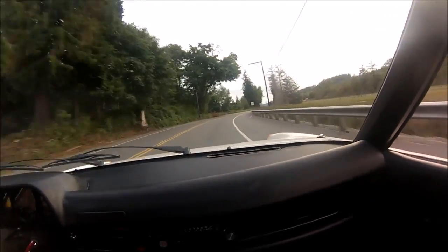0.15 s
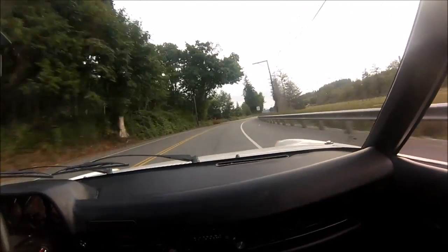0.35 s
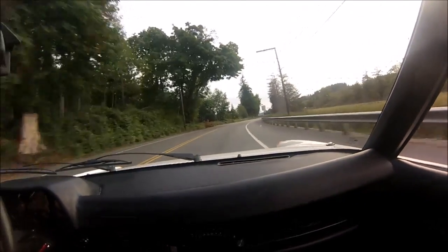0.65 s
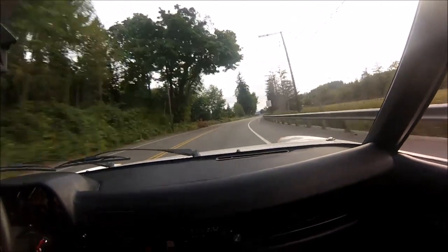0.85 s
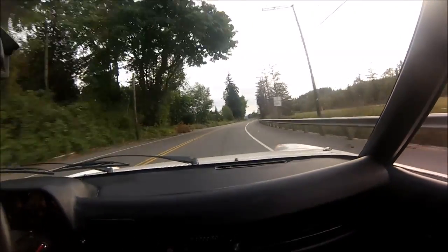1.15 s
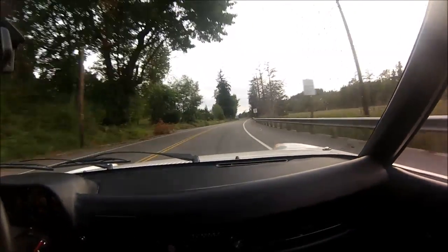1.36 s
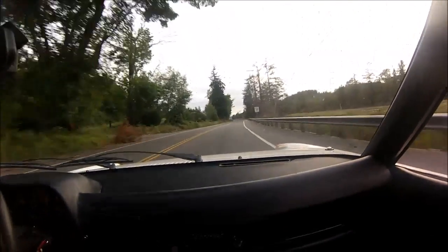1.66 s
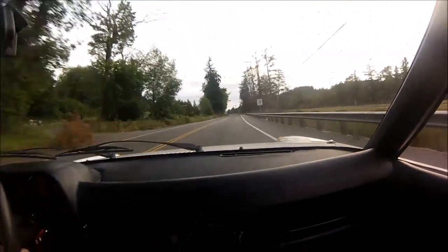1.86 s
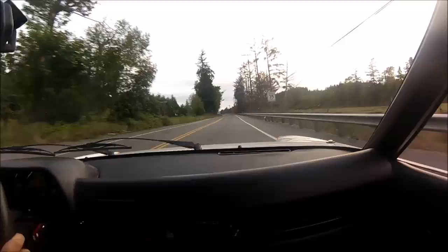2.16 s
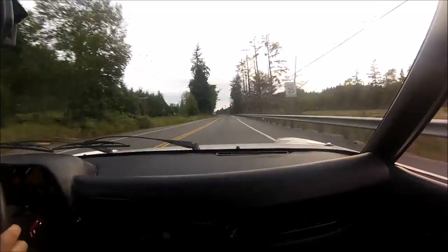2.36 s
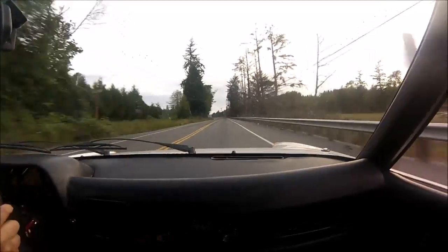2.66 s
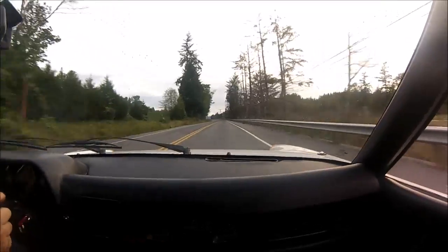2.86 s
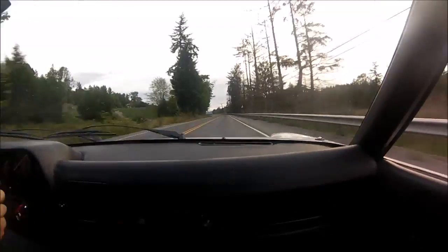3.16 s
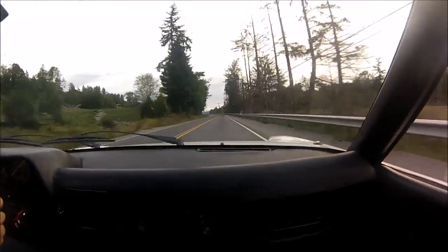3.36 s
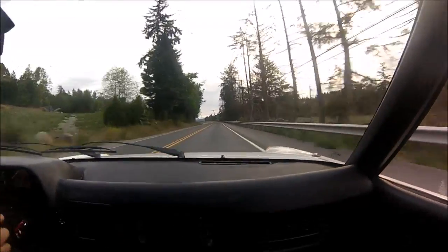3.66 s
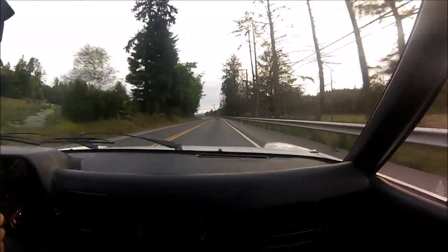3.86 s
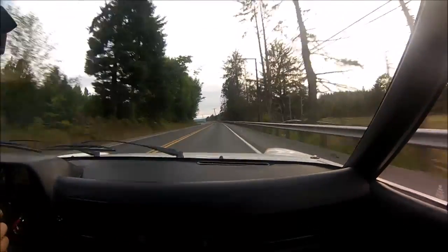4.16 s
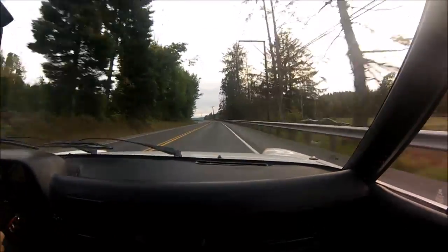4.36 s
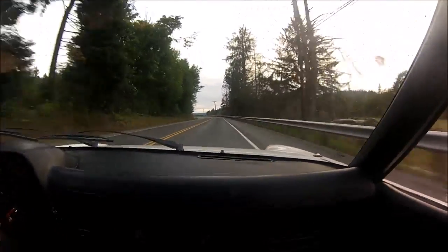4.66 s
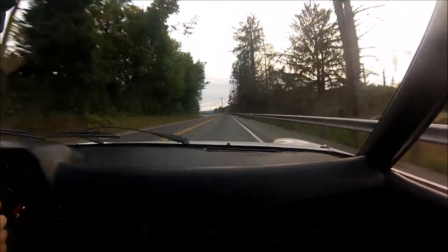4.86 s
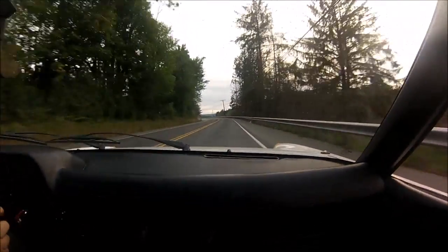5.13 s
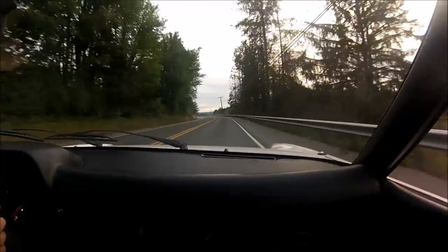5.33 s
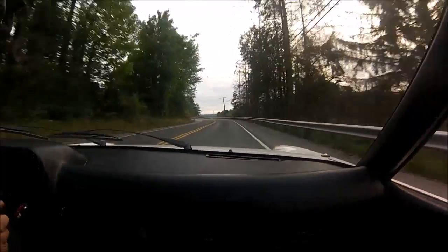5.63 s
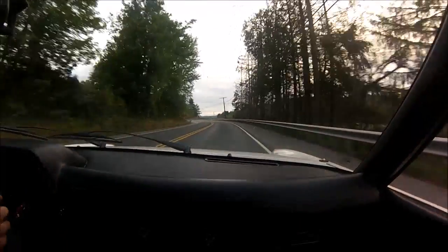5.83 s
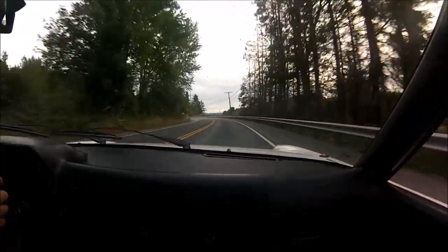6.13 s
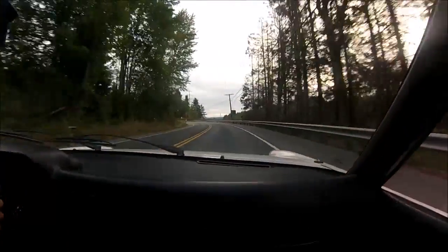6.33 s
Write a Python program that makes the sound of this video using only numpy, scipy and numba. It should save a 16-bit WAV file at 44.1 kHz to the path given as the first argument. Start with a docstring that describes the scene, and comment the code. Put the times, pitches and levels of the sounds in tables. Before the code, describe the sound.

A steady low engine drone and deep body boom fill a tight car cabin. Intake growl and fast squeaky chirping mark the throttle opening, then a hard, buzzing pull climbs gently in pitch. Around four seconds it fades to softer coasting as rushing air swells and loose tin buzzes. Soft low bumps punctuate the roar; the onboard microphone's automatic gain dips after them.

```python
"""Inside a small air-cooled sports car on a country road: the driver opens the throttle, pulls for
about three seconds and lifts off. The engine is a stack of sine tones at multiples of its cycle rate,
which swell as they slide through the cabin's resonances. A high, slightly wobbling tone, pulsed by the
cycle, is the belt's chirp, and short pressure pulses are bumps. Coloured noise makes body boom, road roar,
wind hiss and the buzz of loose tin. An automatic gain control ducks everything after each peak."""
import sys
import numpy as np
from scipy import signal
from scipy.fft import rfft, irfft, next_fast_len
from scipy.io import wavfile
from scipy.ndimage import uniform_filter1d
from numba import njit

SR = 44100
rng = np.random.default_rng(int(sys.argv[2]) if len(sys.argv) > 2 else 0)


def digitize_waveform(pressure):
    """Quantize a signal to 16-bit integers and store it at the path in sys.argv[1].

    Rows of a 2-D input are taken as channels; values are limited to [-1, 1].
    """
    field = np.atleast_2d(pressure).T
    bounded = np.clip(field, -1, 1)
    quanta = np.round(bounded * 32767).astype(np.int16)
    wavfile.write(sys.argv[1], SR, quanta)


N = 286209
T = np.arange(N) / SR  # time of each sample [s]


def engine(hz, phase, throttle):
    """Each multiple of the cycle is a nearly pure tone; fixed resonances lift the tones passing through."""
    # Strength of each tone under load: (multiple of the cycle rate [count], relative level [dB])
    pull_rows = [(2, -20), (4, 0), (5, -9), (6, -10.5), (7, -4.5), (8, -21), (9, -14.5), (10, -24),
                 (11, -26), (12, -26), (13, -29), (14, -32), (15, -20), (16, -25), (17, -28), (18, -28),
                 (19, -22), (20, -26), (21, -34), (22, -33), (23, -30), (24, -22.5), (25, -26.5), (26, -30),
                 (27, -27), (28, -33), (29, -31), (30, -34), (31, -36), (32, -36)]
    # Soft tones that sound throughout, plainest off the throttle: (multiple [count], relative level [dB])
    coast_rows = [(2, -1), (3, -6), (4, 2), (5, -11), (6, -9.5), (8, -11)]
    # Cabin resonances: (pitch [Hz], half width [Hz], boost [dB])
    cabin = [(230, 8, 3), (318, 13, 8), (355, 12, 7), (592, 10, 10), (690, 25, 5), (728, 9, 9),
             (838, 16, 12), (885, 16, 8), (938, 20, 10), (1680, 50, 8), (149, 5, -3)]
    # Intake resonances: (pitch [Hz], half width [Hz], relative level [dB])
    intake = [(590, 14, 0), (552, 12, -6), (295, 12, -5), (728, 16, -13), (860, 50, -12), (950, 20, -11)]
    # Intake howls at part throttle:
    # (full from [s], full until [s], rise [s], level [dB], starting pitch [share of the open pitch])
    howls = [(.45, 0.88, .05, -29.5, .86), (4.3, 4.46, .45, -24, 1)]
    load_open_db, load_shut_db, coast_db = -21, -36.5, -31.5
    # As the revs climb under load, the exhaust loses weight and gains edge
    sag_from_hz, sag_db_per_hz = 34.94, -1.16
    edge_db_per_hz = 1  # per octave above the fourth multiple
    upper_db, upper_slope_db = -36, -0.3336  # multiples above the table, and change per multiple
    howl_rest_db, howl_fall_s, howl_glide_s = -50, .15, .12

    climb_hz = (hz - sag_from_hz) * throttle
    load_db = load_shut_db + (load_open_db - load_shut_db) * throttle + sag_db_per_hz * climb_hz
    howl_db = howl_rest_db
    tuning = 1
    for start_s, end_s, rise_s, db, low in howls:
        howl_db = howl_db + (db - howl_rest_db) * gate(start_s, end_s, rise_s, howl_fall_s)
        # The pitch is low while the howl rises, then glides up to the open pitch
        tuning = tuning - (1 - low) * gate(start_s - rise_s, start_s, rise_s, howl_glide_s)

    pull, coast = dict(pull_rows), dict(coast_rows)
    top_multiple = pull_rows[-1][0]
    out = 0
    for k in sorted(pull.keys() | coast.keys()) + list(range(33, 57)):
        tone_hz = k * hz
        edge_db = edge_db_per_hz * climb_hz * np.log2(k / pull_rows[1][0])
        tone_db = pull.get(k, upper_db + upper_slope_db * (k - top_multiple))
        cabin_db = sum(db * hump(tone_hz, f, w) for f, w, db in cabin)
        load = undb(load_db + edge_db + tone_db + cabin_db)
        howl = undb(howl_db) * sum(undb(db) * hump(tone_hz, f * tuning, w) for f, w, db in intake)
        coasting = undb(coast_db + coast[k] + 3.8 * walk(7.)) if k in coast else 0
        size = np.sqrt(load ** 2 + howl ** 2 + coasting ** 2) * undb(1.2 * walk(9.))
        wander = 0.43 * walk(4.96)  # slow drift of the phase [rad]
        out = out + size * np.sin(k * phase + rng.uniform(0, 2 * np.pi) + wander)
    return np.sqrt(2) * out  # the levels above are rms


def belt(phase):
    """Like a slipping belt, a tone chirps once a cycle; later every second chirp is weaker."""
    pitch_hz, half_length = 5130, .2  # half length as a share of the cycle
    first_s, end_s, rise_s = .745, 1.29, 0.36  # the chirps creep in before first_s
    skip_s, skip_db = .99, -12
    start_db, fade_db_per_s = -45.5, -5
    level = undb(start_db + fade_db_per_s * (T - first_s)) * gate(first_s, end_s, rise_s, .01)
    turns = (phase - phase[int(first_s * SR)]) / (2 * np.pi)
    count = np.round(turns)
    chirp_shape = np.exp(-((turns - count) / half_length) ** 2)
    wobbling_hz = pitch_hz * (1 + .012 * walk(60.))
    tone = np.sin(2 * np.pi * np.cumsum(wobbling_hz) / SR)
    weaker_db = skip_db * (T > skip_s) * (count % 2 == 0)
    return level * undb(weaker_db + 1.5 * walk(32.0)) * chirp_shape * tone


def bumps():
    """Each bump squeezes the cabin air: the pressure jumps one way, then leaks back."""
    # (time of the peak [s], level before gain control [dB], rise [s], direction of the push [sign])
    bump_rows = [(0.218, -1.5, 0.0024, -1), (0.353, -2, 0.0017, -1), (0.631, 0.5, 0.0023, 1),
                 (1.154, -4.5, 0.0042, 1), (1.351, -9, 0.0082, -1), (3.006, -7, 0.0084, 1),
                 (3.256, -1, 0.0023, 1), (4.011, -2.5, 0.0015, -1), (4.66, -3.5, 0.01, -1),
                 (5.01, -1, 0.0057, -1), (5.347, -3.5, 0.012, -1), (5.625, -4, 0.0053, 1),
                 (6.012, -1, 0.0077, 1), (6.157, 1, 0.0049, -1)]
    fall_s = 0.019
    out = np.zeros(N)
    for s, db, rise_s, way in bump_rows:
        side_s = np.where(T < s, rise_s, fall_s)
        out += np.sign(way) * undb(db) * np.exp(-((T - s) / side_s) ** 2)
    return out


def body_boom(throttle):
    """Deep noise of the body, with its peaks softly rounded so that it stays even."""
    # Colour of the boom: (pitch [Hz], relative level [dB])
    boom_colour = [(10, -29), (16, -15), (24, 5), (33, -0.5), (50, -0.5), (62, -6), (80, -15), (115, -5),
                   (150, -14), (200, -21), (270, -39.5), (400, -60)]
    level_db, loaded_db = -13, -3  # loaded_db is added at full throttle
    rounding = .6
    noise = bands(boom_colour, 0.45, 12.0, 1.0)
    return undb(level_db + loaded_db * throttle) * np.tanh(rounding * noise) / rounding


def road_roar(throttle, rush_db, chop):
    """Noise of tyres and engine bay; under load it gets quieter and its balance tips upward."""
    # Colour of the roar: (pitch [Hz], relative level [dB])
    road_colour = [(88, -26), (150, -3.5), (172, -4.5), (217, -2.5), (253, -9), (268, -22), (287, -4),
                   (397, -11), (563, -13.5), (618, -15.5), (710, -16), (960, -13.5), (1270, -24),
                   (1750, -22.5), (2400, -44.5), (3120, -64), (5280, -120)]
    level_db, per_rush, loaded_db = -25.5, 1.23, -3  # the roar swings more than the hiss
    tilt_db, loaded_tilt_db = -0.6, 1.5  # per octave, about 400 Hz
    road_db = level_db + per_rush * rush_db + loaded_db * throttle
    road_tilt_db = tilt_db + loaded_tilt_db * throttle
    return undb(road_db) * (1 + chop) * bands(road_colour, 1.2, 14., .7, road_tilt_db, 400.)


def wind_hiss(rush_db, chop):
    """High noise of wind and cooling fan, which brightens for a moment in each gust."""
    # Colour of the hiss: (pitch [Hz], relative level [dB])
    hiss_colour = [(1180, -20), (2000, -10.5), (2290, -12.5), (2580, -0.5), (3240, -3), (3860, -2),
                   (4770, -8), (5280, -2.5), (6410, -11), (7340, -9.5), (8910, -14.5), (9780, -13.5),
                   (10900, -18.5), (12300, -18), (15000, -28.5)]
    # Brighter moments: (time [s], half length [s], added brightness [dB per octave])
    gusts = [(.8, .3, 4.5), (4.3, 0.1, 3.6)]
    level_db, tilt_db = -47.5, -0.35  # tilt per octave, about 4000 Hz
    noise = bands(hiss_colour, .8, 16., .7, tilt_db + swells(gusts), 4000.)
    return undb(level_db + rush_db) * (1 + .6 * chop) * noise


def tin_buzz(phase):
    """Loose engine tin rings as filtered noise, shaken once a cycle and harder or softer at some moments."""
    # Changes of the buzz: (time [s], half length [s], rise [dB])
    buzzes = [(1.15, 0.34, 12), (3.7, .15, 11), (4.24, 0.24, 11), (4.8, .12, 6), (5.7, 0.23, -2)]
    level_db = -66
    ring_hz, ring_width_hz = 5560, 680  # width of one filter; two in a row are narrower
    ring = signal.iirpeak(ring_hz, ring_hz / ring_width_hz, SR)
    tin = signal.lfilter(*ring, signal.lfilter(*ring, rng.standard_normal(N)))
    tin_db = level_db + swells(buzzes) + 3 * walk(25.)
    return undb(tin_db) * (1 + .4 * np.sin(phase)) * tin / np.std(tin)


def rush_level():
    """Shared rise and fall of the rush of road and wind, in dB."""
    # (time [s], level [dB])
    rush_rows = [(0, 0), (.4, 0), (.55, 0.5), (.85, 1), (1.15, 1), (1.45, -1.5), (2, -3.5), (2.4, -2),
                 (2.9, -.5), (3.5, -2), (3.9, 2.5), (4.25, 4), (4.5, 0), (4.8, 0.5), (5.2, -1.5), (5.55, 0),
                 (5.75, -1.5), (5.87, 3.5), (5.97, -0.5), (6.15, 1), (6.49, -1.5)]
    return curve(rush_rows)


def engine_chop(phase):
    """Valve gear and firings chop the roar and hiss a little at multiples of the cycle."""
    depths = 0.055, 0.1, 0.059, 0.088  # multiples 1 to 4
    return sum(depth * np.sin(k * phase) for k, depth in enumerate(depths, 1))


def engine_speed():
    """Engine cycle rate in Hz, moving in straight lines."""
    # (time [s], engine cycle rate [Hz])
    rev_rows = [(0, 32.9), (.5, 32.23), (.9, 33.03), (1.6, 33.71), (2.65, 35.08), (3.35, 35.76), (4, 36.49),
                (4.4, 36.85), (5.2, 35.7), (6.49, 34.94)]
    return curve(rev_rows)


def throttle_opening():
    """Throttle from 0, shut, to 1, open: it opens, holds and shuts."""
    open_s, opening_s, lift_s, lifting_s = 0.746, 0.19, 3.894, 0.56
    return gate(open_s + opening_s, lift_s, opening_s, lifting_s)


def undb(db):
    """Turn decibels into a factor."""
    return 10 ** (np.asarray(db) / 20)


def curve(rows):
    """A (time, value) table joined by straight lines."""
    return np.interp(T, *np.transpose(rows))


def gate(start_s, end_s, rise_s, fall_s):
    """0 to 1 in the rise before the start, held, back to 0 in the fall after the end."""
    return np.clip(np.minimum(1 + (T - start_s) / rise_s, 1 - (T - end_s) / fall_s), 0, 1)


def swells(rows):
    """Sum of bell-shaped swells."""
    return sum(size * np.exp(-((T - s) / half_s) ** 2) for s, half_s, size in rows)


def walk(rate):
    """Smooth random wander: levels held for 1 / rate seconds, then averaged twice; spread about 0.75."""
    k = int(SR / rate)
    held = np.repeat(rng.standard_normal(N // k + 1), k)
    return 1.02 * uniform_filter1d(uniform_filter1d(held, k), k)[:N]


def hump(hz, centre_hz, half_width_hz):
    """Bell of a resonance: 1 at its centre, one half at the half width."""
    return 1 / (1 + ((hz - centre_hz) / half_width_hz) ** 2)


def bands(points, flicker_db, flicker_rate, shared_db, tilt_db=0., pivot_hz=100.):
    """Coloured noise, rms 1 before its half-octave bands flicker alone and together and tilt per octave."""
    size = next_fast_len(N)
    hz = np.arange(size // 2 + 1) * SR / size + 1e-3  # the offset avoids log(0)
    at, db = np.transpose(points)
    colour_db = np.interp(np.log(hz), np.log(at), db, left=-120, right=-120)
    noise = rfft(rng.standard_normal(size)) * undb(colour_db)
    noise /= np.std(irfft(noise, size))
    step = 2 * np.log2(hz / at[0])  # half octaves above the first point
    shared = walk(flicker_rate)
    out = 0
    for k in range(int(2 * np.log2(at[-1] / at[0])) + 2):
        share = np.clip(1 - np.abs(step - k), 0, 1)  # neighbouring bands crossfade
        octaves = k / 2 - np.log2(pivot_hz / at[0])
        band_db = flicker_db * walk(flicker_rate) + shared_db * shared + tilt_db * octaves
        out = out + undb(band_db) * irfft(noise * share, size)[:N]
    return out


@njit
def follow(x, attack, release):
    """Peak envelope: quick to rise, slow to fall."""
    e, out = .4, np.empty(len(x))
    for i in range(len(x)):
        a = abs(x[i])
        e += (a - e) * (attack if a > e else release)
        out[i] = e
    return out


def scene():
    """Add the engine, belt and bumps to the noise of rolling."""
    hz = engine_speed()
    phase = 2 * np.pi * np.cumsum(hz) / SR
    throttle = throttle_opening()
    rush_db, chop = rush_level(), engine_chop(phase)
    events = engine(hz, phase, throttle) + belt(phase) + bumps()
    rolling = body_boom(throttle) + road_roar(throttle, rush_db, chop)
    rolling = rolling + wind_hiss(rush_db, chop) + tin_buzz(phase)
    return (events + rolling)[None]


def record(dry):
    """Gain control ducks after each pressure peak and creeps back; then deep bass and top are cut."""
    top_db, ratio, attack_s, release_s = -7, 10, 0.0022, 0.1
    bass_cut_hz, top_hz = 25, 15200
    peak = follow(dry[0], 1 / (attack_s * SR), 1 / (release_s * SR))
    gain = np.minimum(1, undb(top_db) / (peak + 1e-9)) ** (1 - 1 / ratio)
    bass_cut = signal.butter(2, bass_cut_hz, "high", fs=SR, output="sos")
    top_cut = signal.ellip(10, .2, 70, top_hz, fs=SR, output="sos")
    return signal.sosfilt(top_cut, signal.sosfilt(bass_cut, dry * gain))


dry = scene()
out = record(dry)
digitize_waveform(out)
```